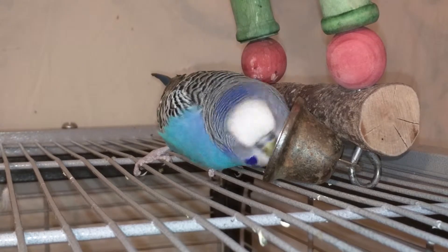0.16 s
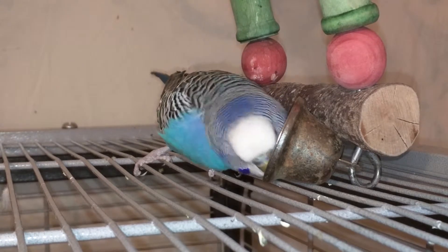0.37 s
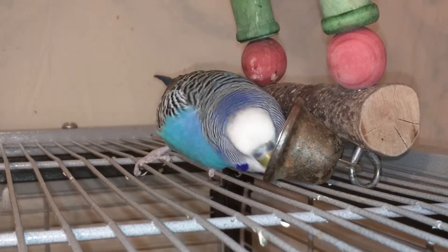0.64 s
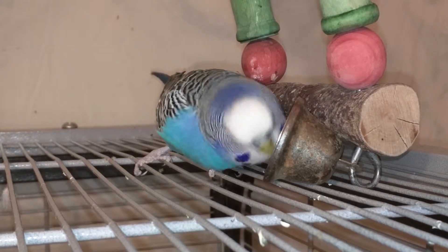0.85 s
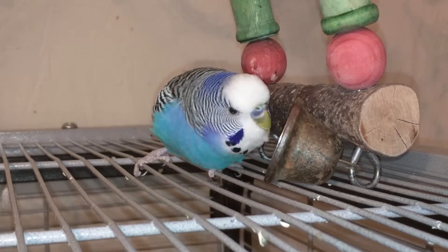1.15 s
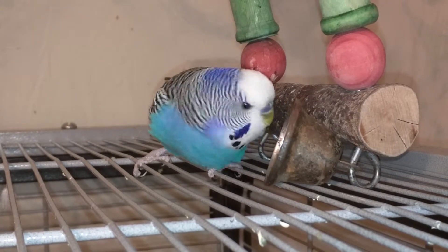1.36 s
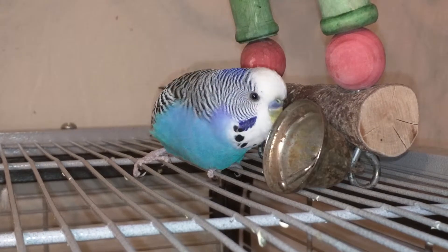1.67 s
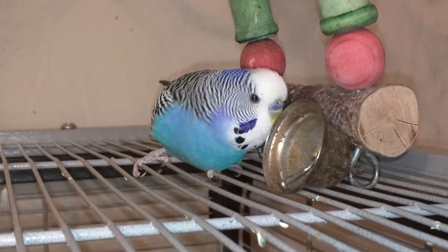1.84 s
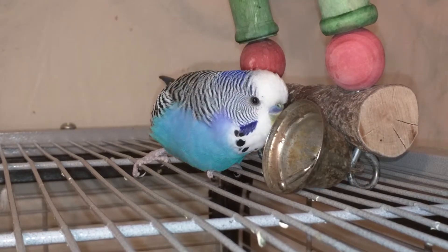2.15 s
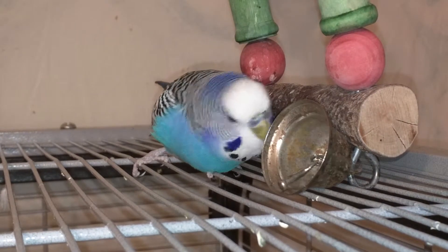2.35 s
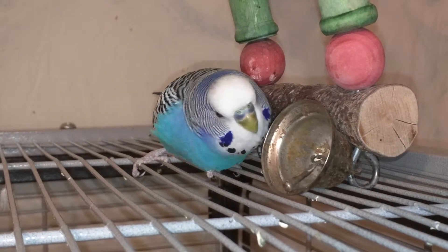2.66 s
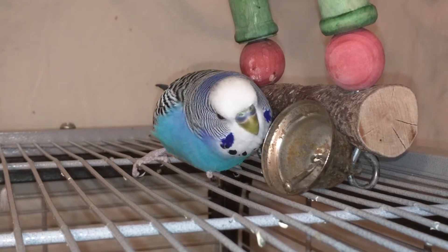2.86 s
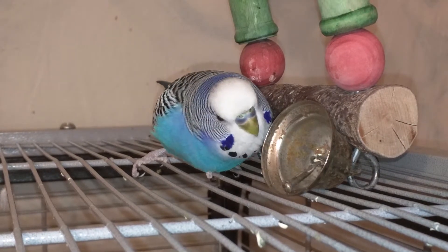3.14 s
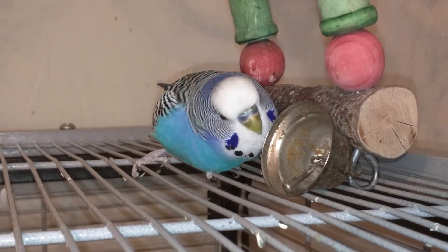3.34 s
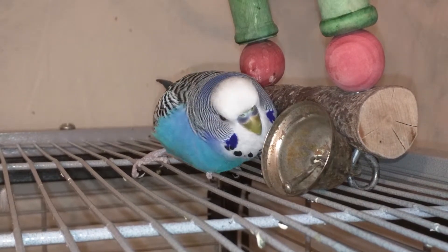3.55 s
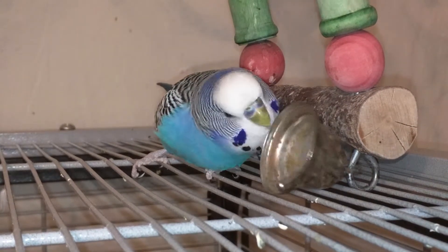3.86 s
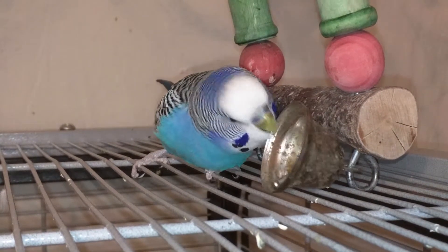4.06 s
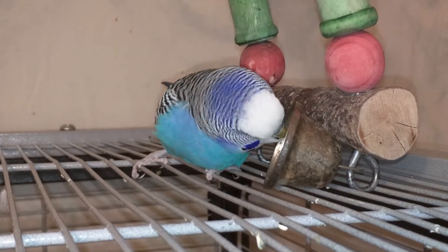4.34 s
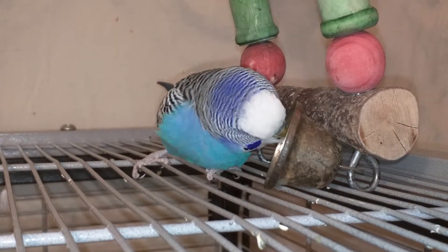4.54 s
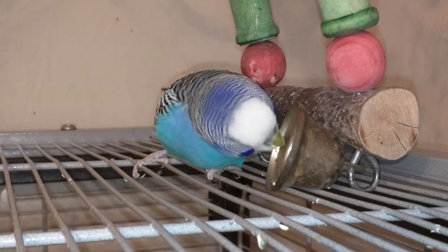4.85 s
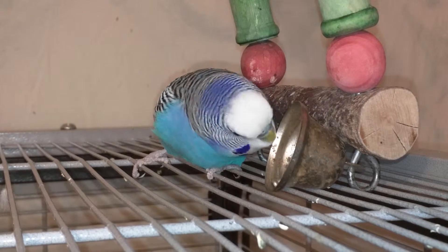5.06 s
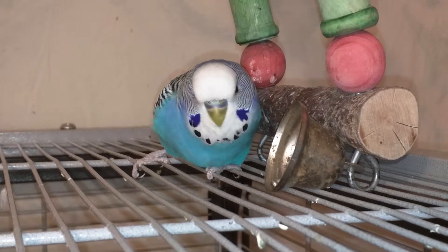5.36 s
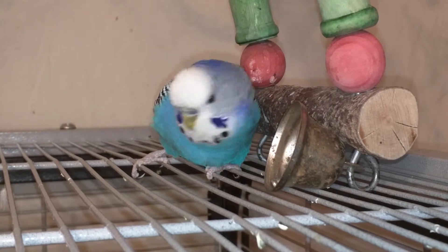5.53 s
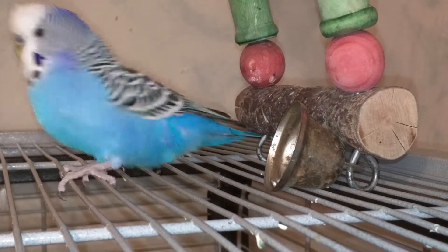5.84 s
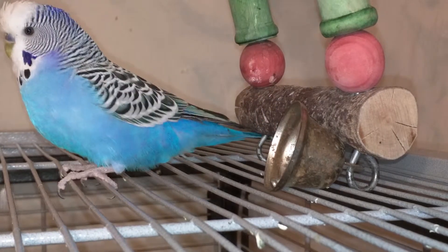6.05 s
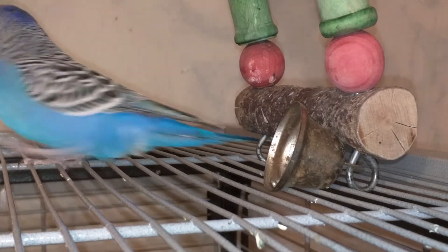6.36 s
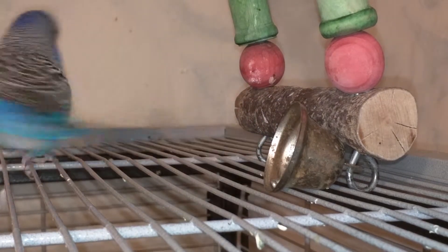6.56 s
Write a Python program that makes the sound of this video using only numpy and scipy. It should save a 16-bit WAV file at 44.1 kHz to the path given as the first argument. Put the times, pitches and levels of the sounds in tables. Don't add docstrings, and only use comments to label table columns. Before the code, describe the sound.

Close up indoors, a small parrot pecks a little metal bell lying on a wire cage roof. Rapid bright ticks build to several hard clanks in the first two seconds, with short high rings from bell and wires. Then sparse dry nibbles, a dull wooden knock and soft pecks follow. Finally claws click on the wires as it hops off. Faint hiss and a distant fan run beneath.

```python
import sys
import numpy as np
from scipy import signal
from scipy.fft import rfft, irfft
from scipy.io import wavfile
from scipy.ndimage import uniform_filter1d

SR = 44100
rng = np.random.default_rng(int(sys.argv[2]) if len(sys.argv) > 2 else 0)


def store_pcm(level_fs):
    pcm = np.round(np.clip(level_fs, -1, 1) * 32767).astype(np.int16)
    wavfile.write(sys.argv[1], SR, np.atleast_2d(pcm).T)


def gain_from_decibels(decibels):
    exponent = np.asarray(decibels, float) / 20
    return 10 ** exponent


N = 295470
LENGTH = 24000


def evened(x):
    return x / np.sqrt(np.mean(x ** 2) + 1e-20)


def read(points, hz):
    f, value = np.transpose(points)
    return np.interp(np.log(hz + 1), np.log(f + 1), value)


def add(mix, start_s, sound):
    part = mix[round(start_s * SR):][:len(sound)]
    part += sound[:len(part)]


def new_dice():
    return np.random.default_rng(rng.integers(2 ** 31))


# pitch_hz, density_db_per_hz
AIR_SPECTRUM = [(12, -40), (20, -4), (59, 1.5), (119, -14), (275, -8.5), (308, -10), (334, -14), (455, -17),
                (672, -19), (1280, -25.5), (1640, -20), (2360, -25.5), (4350, -35), (14400, -33),
                (15700, -34.5)]
# pitch_hz, width_hz, rise_db
FAN_HUMPS = [(62, 18, 0.5), (278, 51, 4.5), (1647, 24, 2), (2324, 15, 11), (2490, 60, 3.5)]


def air():
    frames, hz = N // 512 + 5, np.fft.rfftfreq(2048, 1 / SR)
    real, imaginary, patches = rng.standard_normal((frames, 1025, 3)).T
    patches = uniform_filter1d(patches, 20, 0)
    patches_db = 1.06 * evened(uniform_filter1d(patches, 8, 1))
    humps_db = sum(db / (1 + (2 * (hz - f) / width) ** 2) for f, width, db in FAN_HUMPS)
    steady_db = read(AIR_SPECTRUM, hz) + humps_db
    spectrum = (real + 1j * imaginary) * gain_from_decibels(steady_db[:, None] + patches_db)
    hiss = signal.istft(spectrum, nperseg=2048, noverlap=1536)[1][:N]
    return gain_from_decibels(-53) * evened(hiss)


def coloured(x, gain_db):
    cepstrum = irfft(np.maximum(gain_db, -100) * np.log(10) / 20)
    cepstrum[1:len(cepstrum) // 2] *= 2
    cepstrum[len(cepstrum) // 2 + 1:] = 0
    return irfft(rfft(x) * np.exp(rfft(cepstrum)), len(x))


# pitch_hz, t60_s
ROOM_DECAY = [(500, 0.44), (1500, 0.66), (3500, 0.43), (9000, 0.27), (15000, 0.17)]


def room(x, dice, wet_db):
    hz, t, noise = signal.stft(dice.standard_normal(LENGTH), SR, nperseg=256)
    decay_db = -60 * t / read(ROOM_DECAY, hz)[:, None]
    tail = signal.istft(noise * gain_from_decibels(decay_db), SR, nperseg=256)[1][:LENGTH]
    tail *= np.clip(np.arange(LENGTH) / SR / 0.0023, 0, 1) ** 2
    tail *= gain_from_decibels(wet_db) / np.linalg.norm(tail)
    tail[0] += 1
    tail[round(0.0048 * SR)] += gain_from_decibels(-6.0)
    return signal.fftconvolve(x, tail)[:LENGTH]


def crack(gain_db, dice, fade_s):
    t = np.arange(LENGTH) / SR / fade_s
    burst = dice.standard_normal(LENGTH) * np.exp(-t) * np.clip(t / 0.34, 0, 1)
    chance_db = 10 * np.log10(uniform_filter1d(abs(rfft(burst)) ** 2, size=120) + 1e-9)
    burst = coloured(burst, gain_db - 0.3 * chance_db)
    return burst / np.sqrt(np.mean(burst[:round(1.5 * fade_s * SR)] ** 2))


# pitch_hz, density_db_per_hz
CRACK_SPECTRUM = [(410, -78), (700, -36), (3610, -13.5), (4680, -19.5), (8970, -7.5), (11500, -5),
                  (12900, -11.5), (15700, -14)]


def strike(peak_db, top_db, bright_hz, dull_db, contact_ms, room_db, dice, body, tone=np.zeros(1),
           softer=0, slower=0):
    over_db = peak_db + 30
    dull_db = dull_db - softer * over_db
    contact_ms = min(contact_ms * np.exp(slower * max(-over_db, 0)), 25)
    hz = np.fft.rfftfreq(LENGTH, 1 / SR)
    tilt_db = read([(5000, dull_db + 21), (7500, 0), (12500, 0), (14000, top_db + 14.5)], hz)
    humps = [(bright_hz, 600, 7), *body]
    hump_db = sum(db * np.exp(-((hz - f) / width) ** 2) for f, width, db in humps)
    tick = crack(read(CRACK_SPECTRUM, hz) + tilt_db + hump_db, dice, contact_ms / 1000)
    return gain_from_decibels(peak_db - 10) * (room(tick, dice, room_db) + room(tone, dice, wet_db=-2.0))


# pitch_hz, width_hz, rise_db
BELL_CUP = [(1250, 140, 3), (2170, 175, 6.5), (4330, 220, 4.5), (6700, 185, 2.5), (9640, 180, 5.5),
            (11470, 200, 6)]
# start_s, peak_db, top_part_db, brightest_hz
PECKS = [(0.386, -54, -16, 11900), (0.4989, -44, -23.5, 11700), (0.5205, -41, -25.5, 9400),
         (0.56, -46, -20, 10700), (0.58, -37, -15, 9650), (0.604, -39, -21, 8900), (0.626, -34, -12, 9060),
         (0.6663, -14.5, -14, 9800), (0.8505, -33.5, -24, 9300), (0.908, -27, -16, 12000),
         (0.9682, -34, -16, 10400), (1.046, -41.5, -20, 8900), (1.1143, -38, -18, 9300),
         (1.152, -23, -14, 12700), (1.5884, -35, -18.5, 11400), (1.5976, -22.5, -15, 9800)]


def pecks():
    out = np.zeros(N)
    for start_s, peak_db, top_db, bright_hz in PECKS:
        sound = strike(peak_db, top_db, bright_hz, dull_db=-17, contact_ms=4, room_db=2,
                       dice=new_dice(), body=BELL_CUP, softer=0.15, slower=0.02)
        add(out, start_s, sound)
    return out


def ring(modes, dice, spread_db, detune):
    hz, db, t60 = np.transpose(modes)[:, :, None]
    place, shift, phase = dice.standard_normal((3, len(modes), 1))
    t = np.arange(LENGTH) / SR
    level = gain_from_decibels(db + spread_db * place - 60 * t / t60)
    partials = level * np.sin(2 * np.pi * (hz * (1 + detune * shift) * t + phase))
    return partials.sum(0) * np.clip(t / 0.0035, 0, 1)


# pitch_hz, level_db, t60_s
WIRE_MODES = [(1482, -30, 0.5), (2340, -24, 0.67), (3520, -16.5, 0.78), (4882, -9.5, 0.54),
              (6500, -1.5, 0.27), (8250, -5, 0.37), (10250, 4.5, 0.28), (12540, 6, 0.21),
              (14870, -0.5, 0.23)]


def mesh(dice, lean_db):
    modes = [(hz, db + lean_db(hz), t60) for hz, db, t60 in WIRE_MODES]
    return sum(ring(modes, dice, spread_db=2.5, detune=0.018) for wire in range(8)) / 3


# pitch_hz, level_db, t60_s
LYING_BELL = [(7170, -2.5, 0.16), (10300, -4, 0.18), (10300, -15, 0.28), (11400, 10, 0.14),
              (11840, 2, 0.24), (12600, -16, .2), (13640, -1, 0.16)]
# pitch_hz, level_db, t60_s
LIFTED_BELL = [(7246, -18.5, 0.47), (8600, -31, .25), (10280, -26, 0.34), (10400, -12, .17),
               (11920, -8, .15), (11460, 1.5, 0.29), (11420, -18, .12), (12500, -20, .13),
               (12720, -23.5, .2), (13540, -20, .25), (15100, -22, .15)]
# pitch_hz, level_db, t60_s
TURNED_BELL = [(7230, -5.5, 0.32), (9760, -21, 0.49), (11400, -6, 0.32), (11425, -2.5, 0.33),
               (11710, -21.5, 0.089), (13540, -18, 0.37), (13640, -9, 0.35)]
# start_s, peak_db, top_part_db, wire_ring_db, bell_ring_db
BLOWS = [
    (0.7113, -17, -13, -18, -8),
    (1.2174, -8, -10, -14, -6.5),
    (1.6277, -14.5, -14, -17, -10),
    (1.6486, -19.5, -22, -19, -2),
    (3.3603, -41, -11, -35, -17),
    (4.3393, -51, -19, -33, -5),
    (4.3687, -51, -21, -35, -4),
    (4.759, -47, -24, -35, -4),
]


def blows():
    def rim_lean_db(hz):
        return -24 * abs(np.log2(hz / 3450))

    out = np.zeros(N)
    for start_s, peak_db, top_db, wire_db, bell_db in BLOWS:
        pose = LIFTED_BELL
        if start_s < 1.1:
            pose = LYING_BELL
        elif 1.5 < start_s < 2.0:
            pose = TURNED_BELL
        dice = new_dice()
        tone = gain_from_decibels(bell_db) * ring(pose, dice, spread_db=1.0, detune=0)
        tone = tone + gain_from_decibels(wire_db) * mesh(dice, rim_lean_db)
        sound = strike(peak_db, top_db, bright_hz=11400, dull_db=-16, contact_ms=3, room_db=2.5,
                       dice=dice, body=BELL_CUP, tone=tone, softer=0.27, slower=0.01)
        add(out, start_s, sound)
    return out


# pitch_hz, density_db_per_hz
RUSTLE_SPECTRUM = [(400, -24), (650, -9), (1000, -8), (1300, -0.5), (1600, -6), (2200, -30)]
# start_s, level_db
SHIFTS = [
    (1.655, -56.5),
    (2.25, -62),
    (4.8, -64.5),
    (5.16, -67),
    (5.9, -63.5),
]


def rustles():
    out, hz = np.zeros(N), np.fft.rfftfreq(LENGTH, 1 / SR)
    for start_s, level_db in SHIFTS:
        add(out, start_s, gain_from_decibels(level_db) * crack(read(RUSTLE_SPECTRUM, hz), new_dice(), fade_s=0.05))
    return out


# pitch_hz, width_hz, rise_db
TIPPED_BELL = [(3000, 410, 3), (4420, 160, 3.5), (7600, 180, 3), (14200, 300, 6.5)]
# start_s, peak_db, top_part_db, brightest_hz, dull_part_db
NIBBLES = [
    (2.4608, -32.5, -10.5, 11400, -19.5),
    (2.479, -35.5, -18, 10500, -21.5),
    (2.7371, -27.5, -13, 10500, -18),
    (3.9344, -35.5, -24, 9450, -19.5),
    (4.46, -41.5, -29, 10300, -15),
    (4.7428, -46, -27, 11400, -9.5),
    (4.798, -43, -27, 8500, -7),
    (4.8652, -27, -9.5, 8570, -20),
    (4.9963, -25.5, -10, 9630, -28.5),
    (5.149, -38.5, -17, 11800, -15.5),
]


def nibbles():
    out = np.zeros(N)
    for start_s, peak_db, top_db, bright_hz, dull_db in NIBBLES:
        sound = strike(peak_db, top_db, bright_hz, dull_db, contact_ms=3.8, room_db=2,
                       dice=new_dice(), body=TIPPED_BELL)
        add(out, start_s, sound)
    return out


# pitch_hz, density_db_per_hz
WOOD_SPECTRUM = [(240, -37), (400, -7.5), (823, -8), (1020, 1), (1450, -13), (1750, -5), (2010, -6),
                 (3080, -7.5), (5280, -24), (11400, -19), (15700, -33)]
# pitch_hz, level_db, t60_s
PERCH_MODES = [(1194, -7, .04), (1760, -2, .05), (2290, -9, 0.058), (3100, -10, .04), (4600, -10.5, 0.048)]
# start_s, peak_db
KNOCKS = [
    (3.314, -39),
    (3.329, -31.5),
    (3.344, -38),
]


def perch():
    out, hz = np.zeros(N), np.fft.rfftfreq(LENGTH, 1 / SR)
    for start_s, peak_db in KNOCKS:
        dice = new_dice()
        knock = gain_from_decibels(-3.0) * crack(read(WOOD_SPECTRUM, hz), dice, fade_s=0.0042)
        knock = knock + ring(PERCH_MODES, dice, spread_db=3.5, detune=0.027)
        add(out, start_s, gain_from_decibels(peak_db - 6.0) * room(knock, dice, wet_db=-8.5))
    return out


# start_s, peak_db, top_part_db, brightest_hz, wire_tilt_db_per_octave
STEPS = [
    (5.8646, -54, -19.5, 10000, 0),
    (5.8785, -44, -14, 8250, 3),
    (5.9075, -22, -20, 12400, 2.5),
    (5.9544, -41, -11.5, 10200, -7),
    (6.3829, -55, -15, 11200, -2),
    (6.4313, -32, -9.5, 10500, 6),
    (6.4951, -44, -17, 8260, 5),
    (6.5515, -28.5, -12, 11600, -4.5),
    (6.6159, -25.5, -26, 10300, -3.5),
]


def claws():
    out, body = np.zeros(N), [(hz, 0.013 * hz, 7) for hz, db, t60 in WIRE_MODES]
    for start_s, peak_db, top_db, bright_hz, tilt_db in STEPS:
        def lean_db(hz):
            return tilt_db * np.log2(hz / WIRE_MODES[-3][0])

        dice = new_dice()
        tone = gain_from_decibels(-14.5) * mesh(dice, lean_db)
        sound = strike(peak_db, top_db, bright_hz, dull_db=-27, contact_ms=3.5, room_db=0.5,
                       dice=dice, body=body, tone=tone, softer=0.1, slower=0.1)
        add(out, start_s, sound)
    return out


def scene():
    return (air() + pecks() + blows() + rustles() + nibbles() + perch() + claws())[None]


def band_limit(x):
    return signal.sosfilt(signal.butter(12, 17160, fs=SR, output="sos"), x)


def record(dry):
    low_pass = signal.firwin(511, 15850, window=("kaiser", 8), fs=SR)
    kept = signal.oaconvolve(dry, low_pass[None], "same")
    return band_limit(kept + gain_from_decibels(-33) * (dry - kept))


dry = scene()
out = record(dry)
store_pcm(out)
```